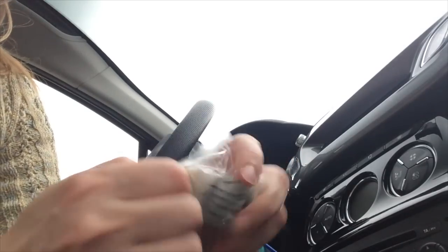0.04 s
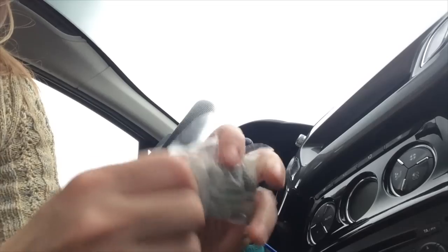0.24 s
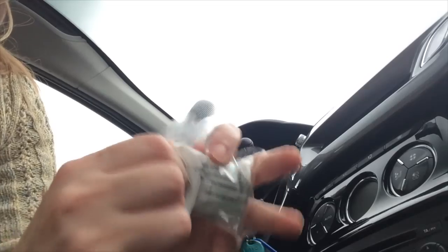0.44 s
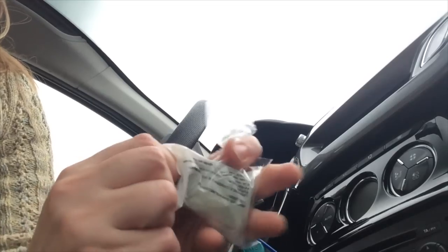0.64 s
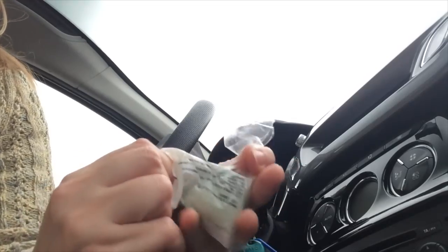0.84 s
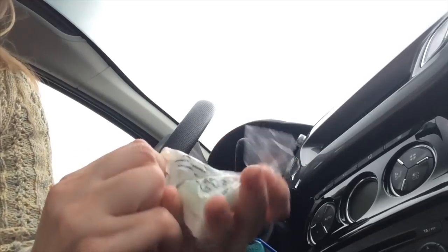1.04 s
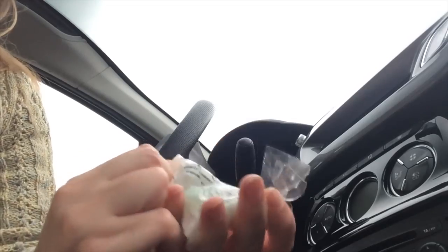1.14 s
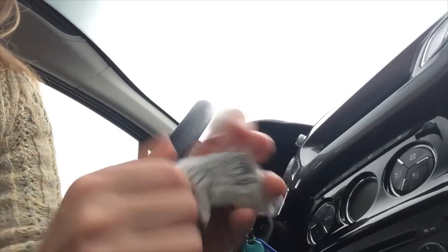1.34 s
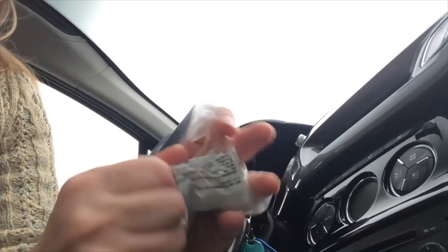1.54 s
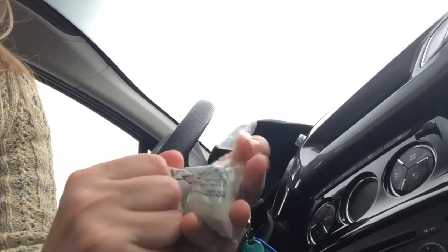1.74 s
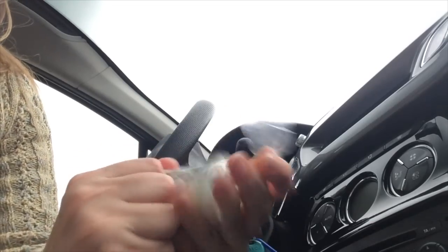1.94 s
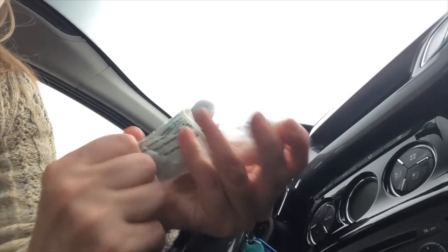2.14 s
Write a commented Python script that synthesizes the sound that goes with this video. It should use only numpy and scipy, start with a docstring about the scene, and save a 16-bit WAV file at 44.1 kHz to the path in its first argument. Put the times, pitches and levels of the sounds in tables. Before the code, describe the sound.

A small thin plastic packet crinkles and snaps in quick irregular bursts, handled close inside a car

```python
"""A small thin plastic packet is unwrapped by hand, close to the microphone, inside a car.
Snaps: creases buckle as clicks coloured by one or two rings of the film facet. Thumps: panels flip over, or
a finger bumps dully, as damped sine swings. Crackles: random small buckles crowd in while the fingers move,
with a sliding hiss. The padded cabin adds short noise tails, a faint rumble and hum; the loudest peaks overload."""
import sys
import numpy as np
from scipy import signal
from scipy.fft import rfft, irfft, next_fast_len
from scipy.io import wavfile

SR = 44100
rng = np.random.default_rng(int(sys.argv[2]) if len(sys.argv) > 2 else 0)


def to_wav(sig):
    """Store sig (one row per channel, or 1-D mono) as 16-bit WAV at the path in sys.argv[1].

    Samples outside -1..1 are clipped; the rate is SR.
    """
    pcm = np.clip(np.atleast_2d(sig), -1, 1) * 32767
    pcm = np.round(pcm).astype(np.int16)
    wavfile.write(sys.argv[1], SR, pcm.T)  # frames by channels


N = 96049

# Cabin rumble spectrum. Each row: frequency in Hz, relative density in dB per Hz.
RUMBLE_SPECTRUM = [(20, -11), (40, -6), (60, -0.5), (76, -6), (98, 4), (125, -6.5), (250, -11.5),
                   (500, -21), (1500, -21), (5000, -37), (15000, -28)]
# Cabin hum. Each row: frequency in Hz, RMS level in dB.
HUM_TONES = [(59.5, -61.5), (97, -65.5)]
# Colour of the cabin tail. Each row: frequency in Hz, gain in dB.
CABIN_COLOUR = [(100, -14), (500, -0.5), (1500, -1), (4000, -0.5), (8000, -0.5), (15000, 1)]
# Colour of the film. Each row: frequency in Hz, gain in dB.
FILM_COLOUR = [(60, -23), (200, -19), (580, -7.5), (1000, -3), (1500, 3.5), (2400, 2.5), (4200, 5.5),
               (7000, 5), (10000, -0.5), (15000, -1), (18000, -19.5)]
# Fingers only shift their grip. Each row: start in seconds, end in seconds, crackle strength in dB.
GRIP_SHIFTS = [(0, .46, -32), (.75, 1.21, -30), (1.29, 1.59, -31), (1.69, 1.85, -40), (1.88, 1.95, -30)]
# Fingers crumple the film. Each row: start in seconds, end in seconds, crackle strength in dB.
CRUMPLES = [(.095, .185, -20), (.218, .285, -30), (.338, .375, -27), (.48, .665, -20), (1.295, 1.37, -29),
            (1.385, 1.46, -28.5), (1.49, 1.535, -30), (1.62, 1.69, -32), (1.95, 2.02, -34),
            (2.095, 2.18, -31.5)]
# The whole hand crushes the packet. Each row: start in seconds, end in seconds, crackle strength in dB.
CRUSHES = [(2.033, 2.084, -14.5)]
# Low thumps: panels of the packet flip over, or (150 Hz) a finger bumps it dully.
# Each row: start in seconds, level before damping in dB, pitch in Hz.
THUMPS = [(.239, -21, 520), (0.3737, -26.5, 330), (.431, -35, 480), (.556, -25, 150), (.774, -27.5, 260),
          (1.062, -24, 328), (1.1157, -19, 370), (1.236, -34.5, 520), (1.575, -23.5, 560),
          (1.6386, -3, 630)]
# Crease snaps; rows almost at the same time form one snap with two rings. Each row: start in seconds,
# strength in dB, facet ring in Hz, height of that ring in dB, brightness in dB per octave.
SNAP_RINGS = [(0.0463, -20.5, 12000.0, 18, 3), (0.0666, -11, 3000, 9, 2.5), (0.0857, 1, 3150, 8.5, 3),
              (0.0919, -3.5, 6176.0, -6, 7.5), (0.1141, -11.5, 1730, 9.5, -4.5),
              (0.126, -8.5, 3000, -7, -2.5), (0.1532, -11.5, 2100, 12, -1.5), (0.1597, -8, 4500, -5, -2),
              (0.1669, -10, 1040, 18.5, 0.5), (0.1792, -0.3, 895, 3.5, -1), (0.2205, -4, 1650, 12, -2.5),
              (0.2273, 0.5, 820, 15, -2.5), (0.2556, -0.5, 1530, 12, 0.2), (0.2661, -7, 1560, 15.1, 3.5),
              (0.2813, -6, 4735.0, 5, -2), (0.3164, -8, 1470, 14.5, -2.5), (0.3356, -18, 5408.0, 24.5, -7),
              (0.3427, 7, 962.0, 4, 0.5), (0.3534, -4, 2400, 6.5, -3), (0.3728, -15.5, 1040, 23, -1.5),
              (0.3857, -27, 950, 18, -5), (0.4402, -23, 1110, 9, -6), (0.397, -4.5, 12000.0, 10.5, -1.5),
              (0.4684, -10.5, 12000.0, 12, -4), (0.482, 0.2, 5700, 13.5, -0.3), (0.5015, -9.5, 2500, 8, 0),
              (0.5112, -16, 6000, 12, 4), (0.517, -3.5, 1090, 11, 1.5), (0.5228, -9.5, 5730, 12, 1),
              (0.535, -15, 9200.0, 9, 3), (0.5428, -11.5, 11000, 10, 3.5), (0.5516, -13, 3000, 10, -2),
              (0.5572, -11.5, 1900, 7, -1), (0.5725, -5, 1120, 18, 1.5), (0.5887, -7, 10000, 7, 1),
              (0.597, -6.5, 7500, 9, 0), (0.6182, -5.5, 2900, 13.5, -1), (0.6526, 4.5, 1560, 15, 2.5),
              (0.67, -12, 12000.0, 6.5, 2), (0.7171, -9.5, 4200, 5, 4.3), (0.766, -3.5, 3260, 7, -2.5),
              (0.774, -4.5, 12000.0, 11.5, 0.2), (0.781, -8.5, 3700, 14.5, 3), (0.7944, -2, 9300, 3.5, 4.5),
              (0.8103, -2, 1540, 7, 3.5), (0.824, 2.5, 5050, 10, 0), (0.89, -4.5, 12000.0, 22.5, -3),
              (0.919, -8.5, 1980, 17, 3.5), (0.9235, -13, 3940, 10, 3), (0.9343, -19.5, 3397.0, 12, 5),
              (0.9693, -8, 1390, 13, -0.2), (0.9744, -4.5, 1531.0, 10, 3.5), (0.9965, -8.5, 1997.0, 6, 0.5),
              (1.0268, -8, 8500, 11.5, 2), (1.0605, 0.5, 1170, 12.5, -2), (1.0615, 0, 5230, 12, 5),
              (1.1096, -6, 1341.0, 0, -4.5), (1.116, 5, 900.0, -1, 2.5), (1.1231, -5.5, 1997.0, 9, 2),
              (1.1536, -12.5, 1700, 10, -2), (1.1755, -12, 1450, 17, 0.5), (1.1753, -2, 5970, 8.2, 1),
              (1.213, -5.5, 2700, 9, 2.5), (1.2944, -5, 1500, 13, 2), (1.3043, -1, 11700, 8, -1),
              (1.3206, -9, 1028.0, 5, -1), (1.3463, -6.5, 2120, 11, -3), (1.3826, 0.5, 4070, 7.5, -0.7),
              (1.3982, -0.5, 3450, 15.5, 0.7), (1.4074, -6.5, 1040, 14.5, -3), (1.4143, -1.5, 1650, 11, -3),
              (1.4308, -9.5, 4380, 16.5, -1.5), (1.4336, -1.5, 1640, 13, -0.5),
              (1.452, -7.5, 3000, 15.5, 0), (1.478, -14.5, 1600, 13.5, -7), (1.4942, -2, 2300, 12, -2.5),
              (1.518, -5, 1860, 15, -0.5), (1.525, -11.5, 4040, 18, -1.5), (1.5302, -12, 4650, 15.5, -2),
              (1.5752, 0.9, 2210, 3.5, 3), (1.6278, -21, 2500, 7, 3), (1.6387, 4.5, 4870, 5, 2.5),
              (1.651, -15, 5030, 13.5, 1.5), (1.7088, -19.5, 6130, 20.5, -0.5),
              (1.7196, -12, 1660, 15.5, -2.5), (1.7201, -13, 2740, 21.5, -4.5),
              (1.7661, -14.5, 2620, 9.5, -2.5), (1.7867, -24.5, 6560, 26, -3),
              (1.7875, -13, 1960, 21, -0.5), (1.8332, -16.5, 2700, 11.5, -2.5), (1.8941, -4, 2800, 6, 2.7),
              (1.9434, 4.5, 1200, 11.5, 0), (1.9561, -6, 2605.0, 12.5, -2.2), (1.96, -14.5, 3470, 15, -8.5),
              (1.9908, 3, 962.0, 11, -0.5), (1.9946, 3, 950, 15.2, 6), (2.0081, -0.5, 1433.0, 9, 2),
              (2.0235, 2.5, 3420, 11.5, -3.9), (2.027, 3, 2760, 15, 3), (2.0332, 13, 4260, 8, -4),
              (2.049, 7.5, 1290, 6, -3), (2.0508, 13, 1600, 15.5, 3.5), (2.0546, 10, 1690, 15.5, 3),
              (2.0593, 0, 1860, 21, 0), (2.0686, 1.5, 2975.0, 11, -1.5), (2.0752, 8, 3320, 8.5, -2),
              (2.0847, 3, 2000, 2, -1.5), (2.0876, 0, 3460, 18.5, 5.5), (2.093, -1.5, 2605.0, 7, 8),
              (2.108, -8, 3800, 19, -1), (2.13, -14, 2830, 18, -0.5), (2.1336, -10, 2134.0, 9, -2),
              (2.158, -15.5, 3360, 17.5, -4.5), (2.1762, -15, 3480, 10, -4.5)]

RUMBLE_RMS_DB = -57.5
CABIN_T60_S, CABIN_DB, CABIN_DELAY_S = 0.04, -6, 0.001194
LATE_T60_S, LATE_DB = 0.12, -22
TAIL_RING_SHARE = 0.65  # the tail blends all directions, so a facet's ring stands out less in it
RING_HALF_WIDTH_OCTAVES = 0.48  # the ring's dB height halves this far from its centre
FLUTTER_DECAY_S, FLUTTER_DB = 0.00045, -3  # the facet rattles briefly as it settles
BEND_DELAY_1KHZ_S = 0.0004  # delay of bending waves at 1 kHz; higher ones arrive sooner
ATTACK_S, RELEASE_S = 0.0056, 0.012
SHIFT_CRACKLES_PER_S, CRUMPLE_CRACKLES_PER_S, CRUSH_CRACKLES_PER_S = 200, 600, 2200
CRACKLE_SPREAD_DB = 4.5
CRACKLE_LOW_HZ, CRACKLE_HIGH_HZ = 1000, 12000
CRACKLE_RING_DB, CRACKLE_TILT_DB_PER_OCTAVE = 13, -1.43
RUB_DB = -32.5  # hiss of film sliding on film, relative to the crackles
THUMP_T60_CYCLES = 1.9
THUMP_LOW_HZ = 212  # the small packet radiates little below this
OVERLOAD_PEAK = 0.87
CUTOFF_HZ = 15400


def from_db(db):
    """Amplitude factor of a level in dB."""
    return 10 ** (np.asarray(db) / 20)


def at_hz(points, hz):
    """Spectrum in dB, interpolated over log frequency."""
    points = np.array(points)
    return np.interp(np.log(hz), np.log(points[:, 0]), points[:, 1])


def bins_hz(size):
    """FFT bin frequencies, at least 1 Hz so that logs exist."""
    return np.maximum(np.arange(size // 2 + 1) * SR / size, 1)


def coloured(x, spectrum):
    """Filter x by a dB spectrum without phase shift."""
    return irfft(rfft(x) * from_db(at_hz(spectrum, bins_hz(len(x)))), len(x))


def dying_noise(t60_s, size):
    """Exponentially decaying noise of unit energy."""
    noise = rng.standard_normal(size) * from_db(-60 * np.arange(size) / SR / t60_s)
    return noise / np.linalg.norm(noise)


def background():
    """Cabin background: shaped noise as rumble, steady sines as hum."""
    t = np.arange(N) / SR
    rumble = coloured(rng.standard_normal(next_fast_len(N)), RUMBLE_SPECTRUM)[:N]
    out = from_db(RUMBLE_RMS_DB) * rumble / rumble.std()
    for hz, rms_db in HUM_TONES:
        out += from_db(rms_db) * np.sqrt(2) * np.sin(2 * np.pi * (hz * t + rng.random()))
    return out


def facet(ring_hz, ring_db, tilt_db, size=1024):
    """One buckle of the film: a causal click with a broad ring, smeared by dispersion and flutter."""
    hz = bins_hz(size)
    octaves = np.log2(np.clip(hz, 700, 12000) / 4000)
    ring = ring_db / (1 + (np.log2(hz / ring_hz) / RING_HALF_WIDTH_OCTAVES) ** 2)
    db = at_hz(FILM_COLOUR, hz) + tilt_db * octaves + ring
    # minimum phase: fold the cepstrum onto positive times
    cepstrum = irfft(np.log(from_db(db)))
    causal = np.exp(rfft(np.r_[cepstrum[0], 2 * cepstrum[1:size // 2]], size))
    # group delay falls as 1 / sqrt(Hz), as for bending waves
    phase_lag = 4 * np.pi * BEND_DELAY_1KHZ_S * np.sqrt(1000 * hz)
    click = irfft(causal * np.exp(-1j * phase_lag))
    flutter = from_db(FLUTTER_DB) * dying_noise(FLUTTER_DECAY_S * np.log(1000), size)
    out = click + signal.fftconvolve(click, flutter)[:size]
    return out * np.linalg.norm(click) / np.linalg.norm(out)


def buckle(ring_hz, ring_db, tilt_db, size=6000):
    """A facet and its cabin tail; each facet faces another way, so each call draws its own tail."""
    early = from_db(CABIN_DB) * dying_noise(CABIN_T60_S, size)
    late = from_db(LATE_DB) * dying_noise(LATE_T60_S, size)
    delay = np.zeros(int(CABIN_DELAY_S * SR))
    path = coloured(np.r_[delay, early + late][:size], CABIN_COLOUR)
    direct = facet(ring_hz, ring_db, tilt_db)
    spread = facet(ring_hz, TAIL_RING_SHARE * ring_db, tilt_db)
    spread *= np.linalg.norm(direct) / np.linalg.norm(spread)
    out = signal.fftconvolve(spread, path)
    out[:len(direct)] += direct
    return out


def effort(rows):
    """Finger movements swell exponentially, hold and let go; the strongest one counts."""
    t = np.arange(N) / SR
    envelopes = []
    for start, end, db in rows:
        swell = np.minimum(t - start, 0) / ATTACK_S
        release = np.maximum(t - end, 0) / RELEASE_S
        envelopes.append(from_db(db) * np.exp(swell - release))
    return np.max(envelopes, axis=0)


def crackles(rows, per_s, facet_count=16):
    """Small buckles at random moments plus sliding hiss, dealt at random to facets of many sizes."""
    size_db = CRACKLE_SPREAD_DB * (np.minimum(rng.exponential(1, N), 3) - 1.5)
    impulses = from_db(size_db) * rng.choice([-1, 1], N) * (rng.random(N) < per_s / SR)
    rub = from_db(RUB_DB) * rng.standard_normal(N)
    drive = effort(rows) * (impulses + rub)
    dealt = rng.integers(0, facet_count, N)
    out = np.zeros(N)
    for k, hz in enumerate(np.geomspace(CRACKLE_LOW_HZ, CRACKLE_HIGH_HZ, facet_count)):
        response = buckle(hz, CRACKLE_RING_DB, CRACKLE_TILT_DB_PER_OCTAVE)
        out += signal.oaconvolve(drive * (dealt == k), response)[:N]
    return out


def thumps():
    """Panels flip over, or a finger bumps the packet dully; each is a heavily damped sine swing."""
    t = np.arange(N) / SR
    swings = np.zeros(N)
    for start, db, hz in THUMPS:
        cycles = hz * np.maximum(t - start, 0)
        damping = np.exp(-np.log(1000) * np.minimum(cycles / THUMP_T60_CYCLES, 10))
        swings += from_db(db) * np.sin(2 * np.pi * cycles) * damping
    high_pass = signal.butter(2, THUMP_LOW_HZ, "high", fs=SR, output="sos")
    return signal.sosfilt(high_pass, swings + 1e-18)  # tiny offset keeps the filter off denormals


def snaps():
    """Creases snap; each row adds one ringing buckle, and rows almost together form one snap."""
    out = np.zeros(N + SR)
    for start, db, ring_hz, ring_db, tilt_db in SNAP_RINGS:
        ringing = from_db(db) * buckle(ring_hz, ring_db, tilt_db)
        i = int(start * SR)
        out[i:i + len(ringing)] += ringing
    return out[:N]


def scene():
    """The packet in the hands over the cabin background, as one channel."""
    rustle = (crackles(GRIP_SHIFTS, SHIFT_CRACKLES_PER_S) + crackles(CRUMPLES, CRUMPLE_CRACKLES_PER_S)
              + crackles(CRUSHES, CRUSH_CRACKLES_PER_S))
    return (background() + rustle + thumps() + snaps())[None]


def record(dry):
    """Clip the loudest peaks, then cut the top with a linear-phase low-pass."""
    low_pass = signal.firwin(129, CUTOFF_HZ, fs=SR, window=("kaiser", 7))
    return signal.fftconvolve(np.clip(dry, -OVERLOAD_PEAK, OVERLOAD_PEAK), low_pass[None], "same")


dry = scene()
out = record(dry)
to_wav(out)
```